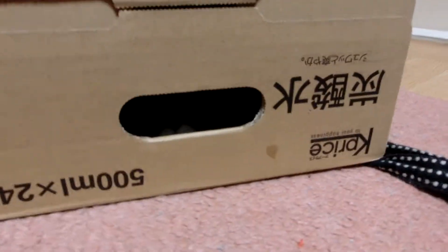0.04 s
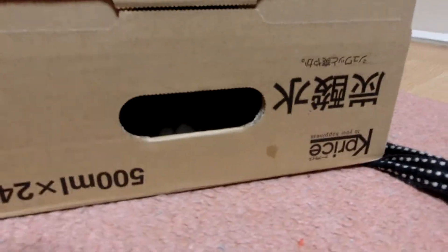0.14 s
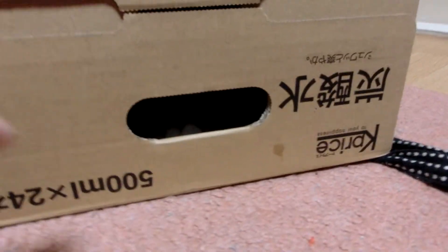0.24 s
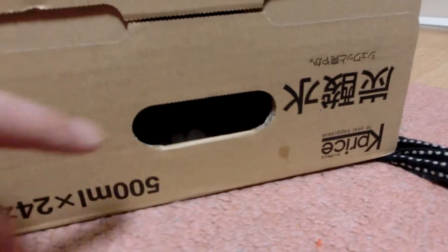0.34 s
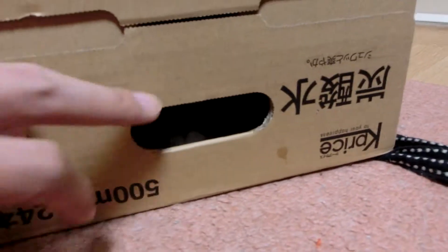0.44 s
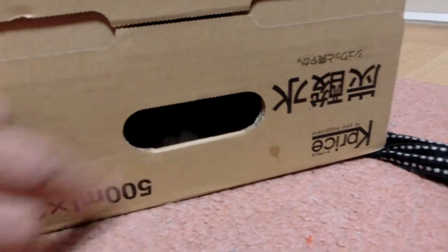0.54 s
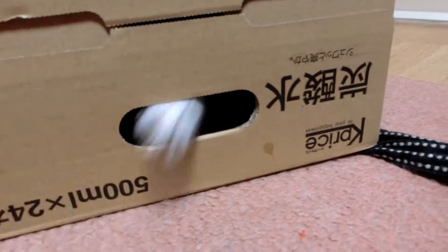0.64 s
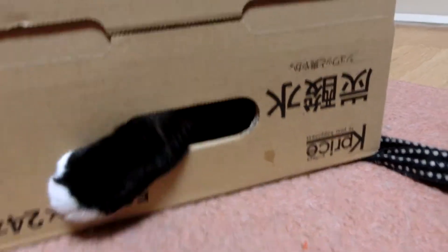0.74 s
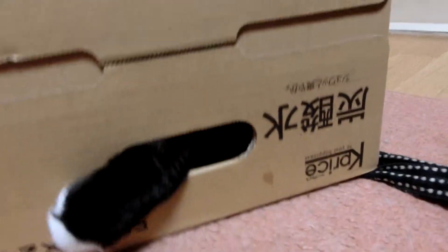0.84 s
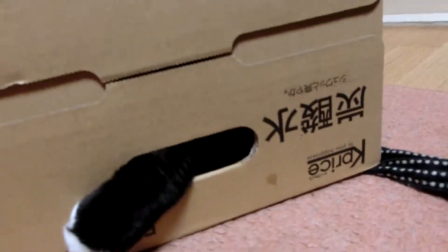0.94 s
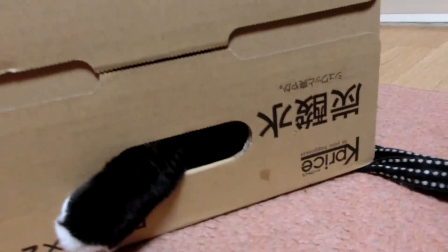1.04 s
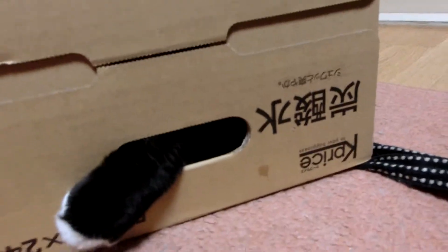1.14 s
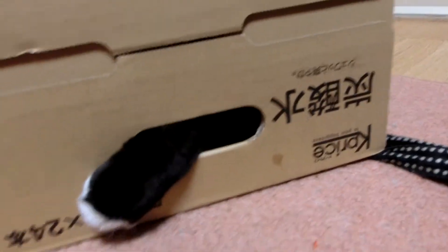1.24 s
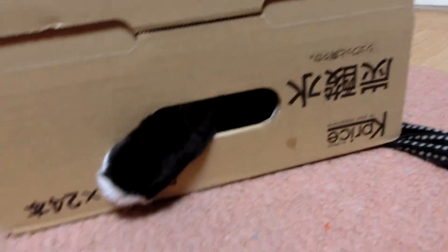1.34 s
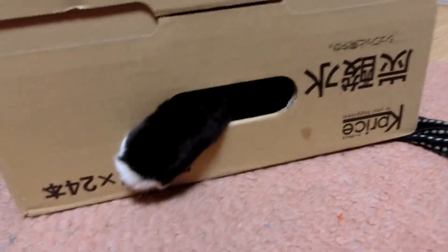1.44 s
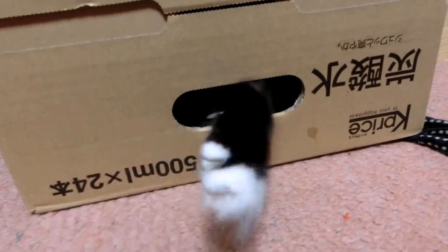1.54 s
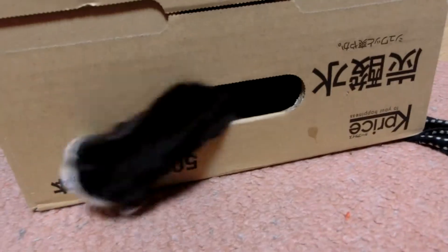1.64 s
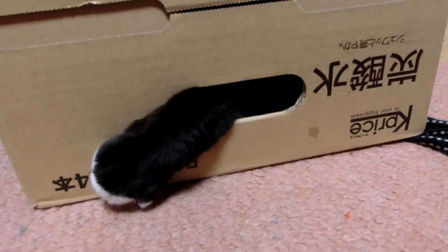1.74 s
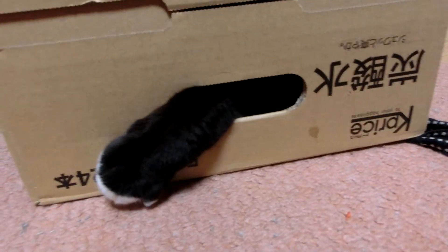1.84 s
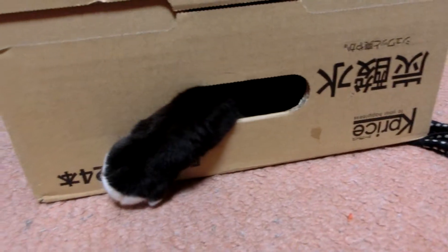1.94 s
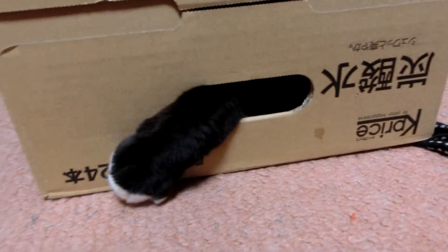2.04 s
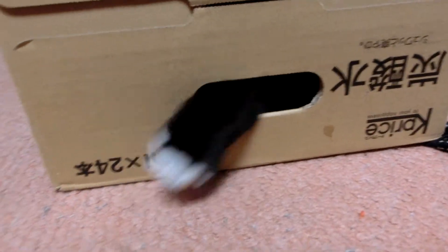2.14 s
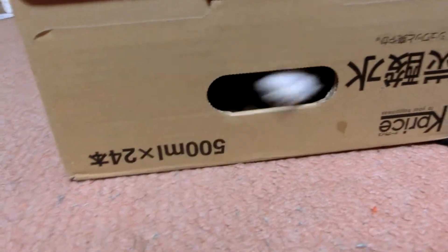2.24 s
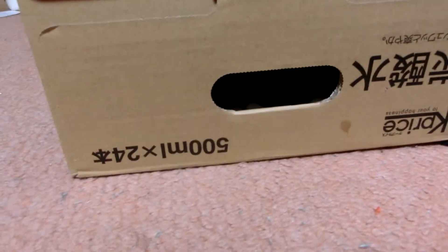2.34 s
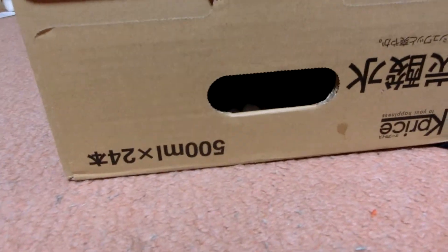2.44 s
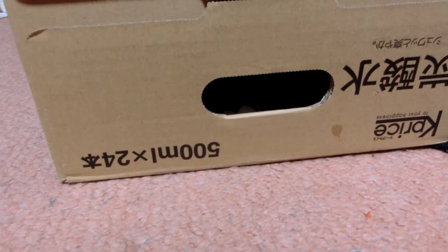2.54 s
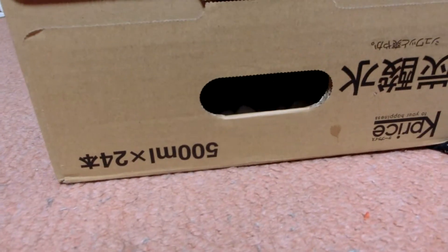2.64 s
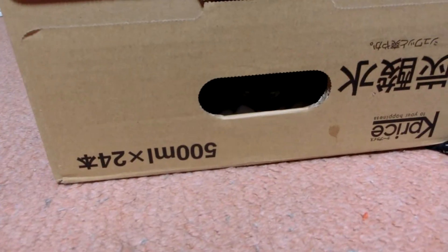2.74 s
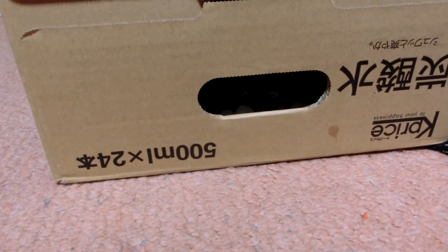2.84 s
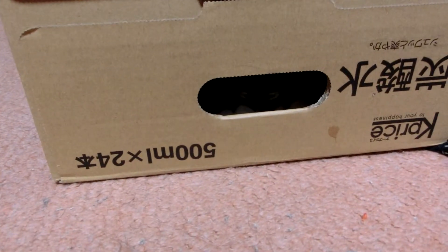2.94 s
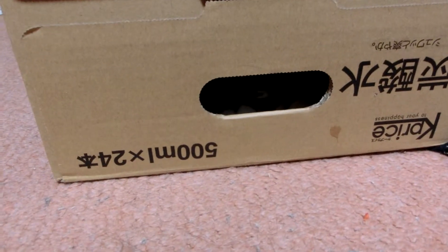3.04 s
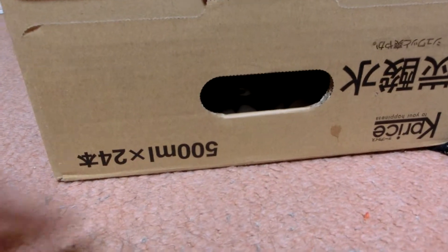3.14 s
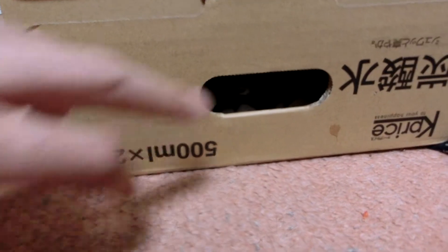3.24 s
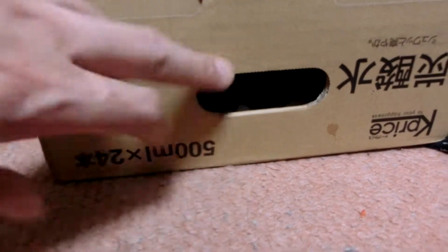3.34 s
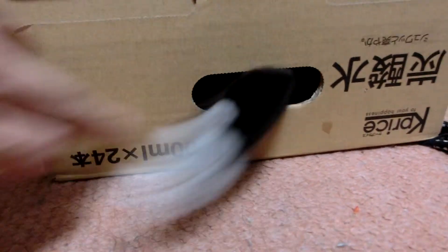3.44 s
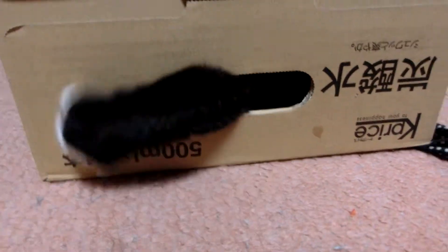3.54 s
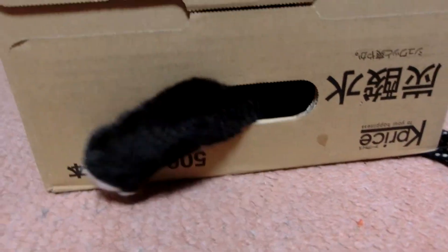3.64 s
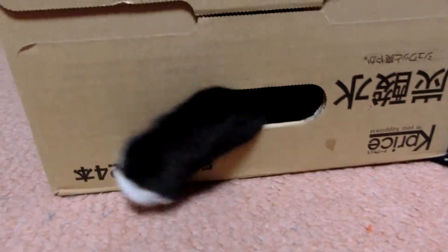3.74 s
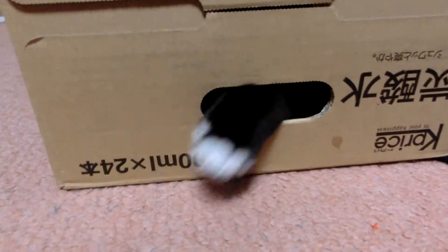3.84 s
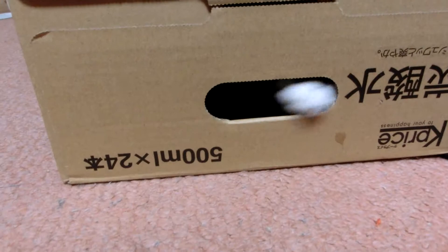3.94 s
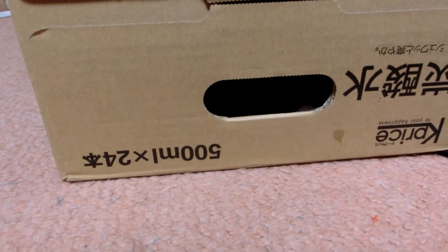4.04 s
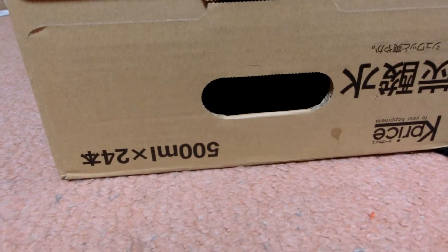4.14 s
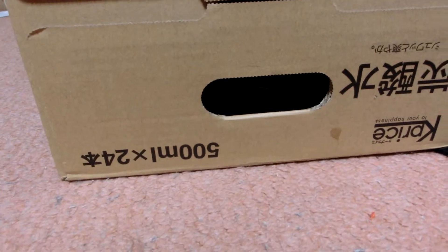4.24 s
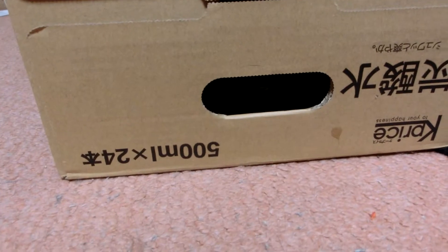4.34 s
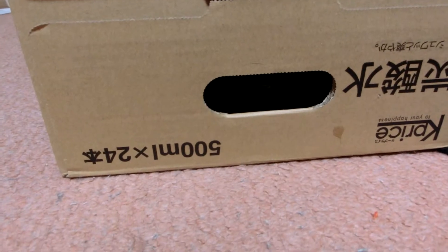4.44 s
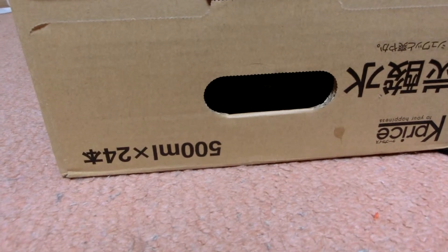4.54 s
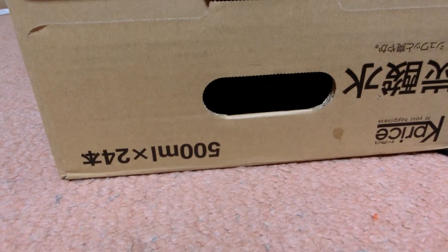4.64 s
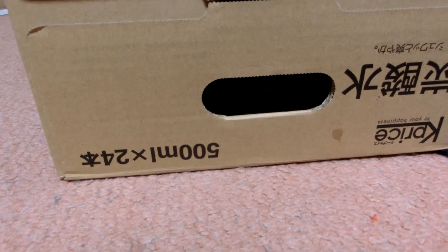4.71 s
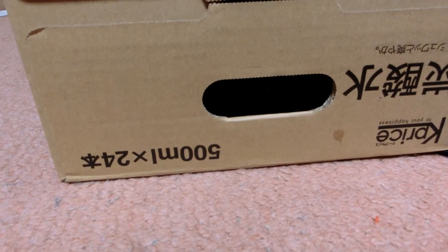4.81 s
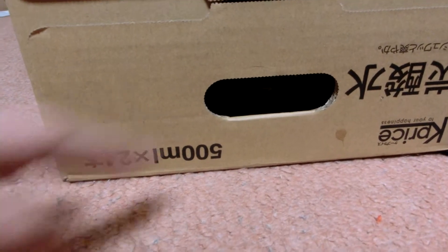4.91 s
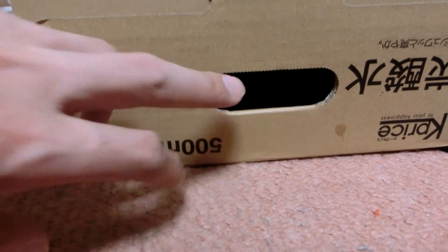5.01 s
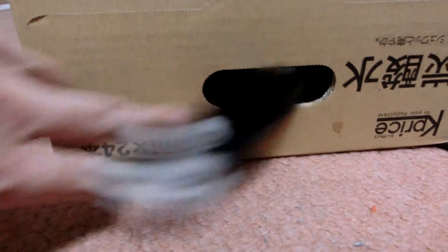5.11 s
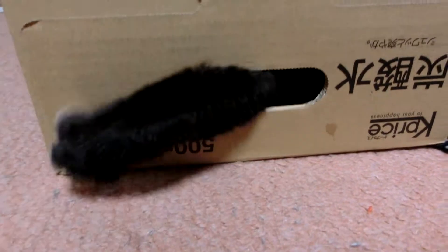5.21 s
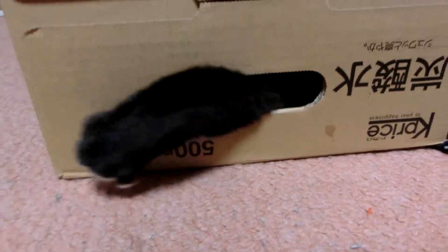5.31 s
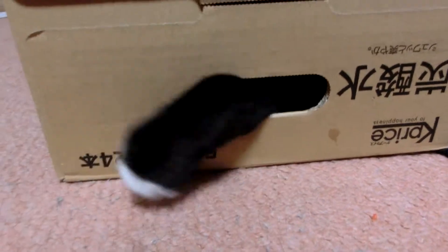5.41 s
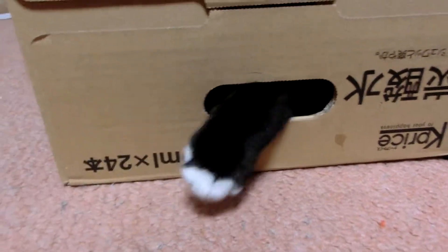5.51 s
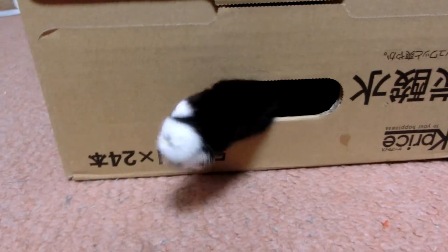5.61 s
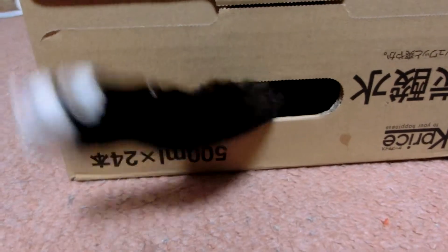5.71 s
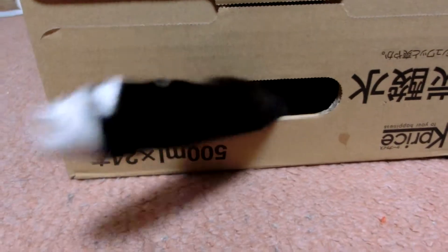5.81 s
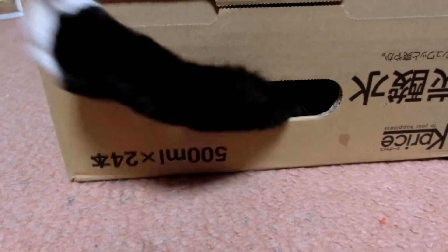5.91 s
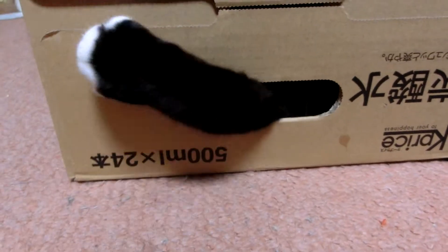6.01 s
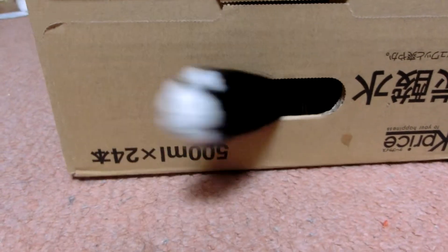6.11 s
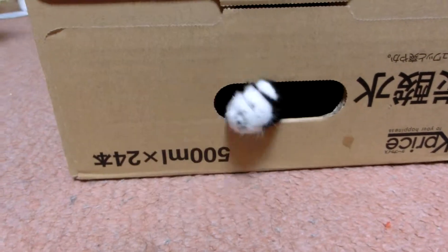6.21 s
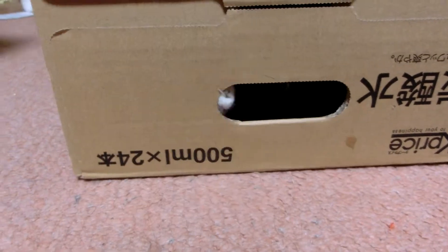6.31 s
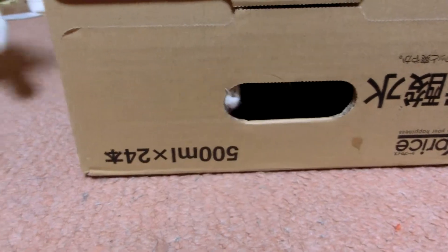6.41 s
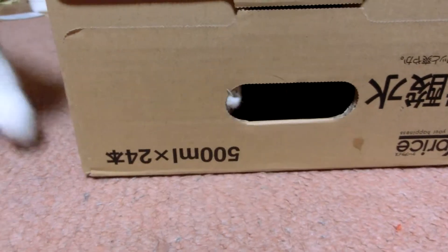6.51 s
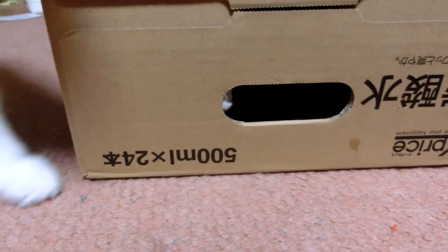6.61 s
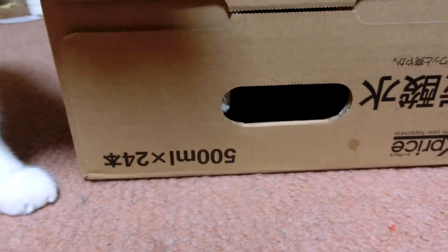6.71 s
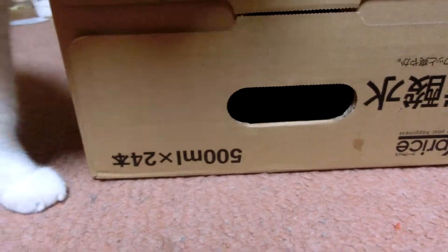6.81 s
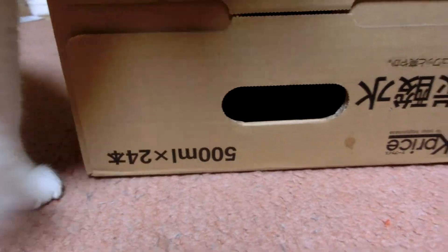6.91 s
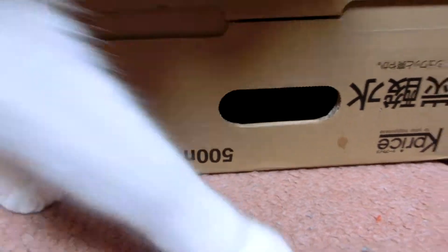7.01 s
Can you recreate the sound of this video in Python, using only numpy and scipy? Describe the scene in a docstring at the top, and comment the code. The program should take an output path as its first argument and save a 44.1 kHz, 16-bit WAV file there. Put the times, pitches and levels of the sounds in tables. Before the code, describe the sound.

A dry handling rustle opens the scene over a faint low mains hum and soft room hiss. At about 0.5 s there is a light bump, then at 0.7 s a cluster of hollow cardboard knocks with scraping. Around 1.5 s fur drags and swells into a hard, boxy thud with claw ticks at 1.66 s. Lighter brushing and a small tap follow at 2.1 to 2.4 s, then quiet. A fingertip taps and rasps the card at 3.23 s; from 3.4 to 3.7 s two strong thumps, the second with a loud crack, come with rough scrapes and small squeaks. After a faint rub near 4 s it is nearly silent until 5.1 s, when rapid deep thumps and rattling knocks begin. Scuffs, shoves and claw ticks continue to about 6.4 s, with a sharp knock at 6 s. A soft bump follows at 6.6 s, then a bright, crisp claw click at 6.8 s.

```python
"""A cat inside a cardboard box on a carpet swipes a paw out through the handle hole, close to a camera.
Soft pads thump the air in the box as damped swings; knuckles and claws excite decaying modes of its walls.
Fur drags, shoves and coarse rasps are random slips shaped by spectra and strokes; brief pitched sounds flutter.
Near 3.23 s a fingertip taps and brushes the card; a handling rustle opens the scene.
A mains appliance hums as two sines over filtered room noise; gain control sinks after the hardest blows."""
import sys
import numpy as np
from scipy import signal
from scipy.fft import rfft, irfft
from scipy.io import wavfile
from scipy.ndimage import uniform_filter1d

SR = 44100
rng = np.random.default_rng(int(sys.argv[2]) if len(sys.argv) > 2 else 0)


def put_to_file(sound):
    """Save the sound as 16-bit audio at rate SR, in the file named by the first command-line argument."""
    columns = np.atleast_2d(sound).T  # one column per channel
    safe = np.clip(columns, -1, 1)
    whole_steps = np.round(safe * 32767)
    wavfile.write(sys.argv[1], SR, whole_steps.astype(np.int16))


N = 311346

# Tones of the mains appliance: pitch_hz, level_db (rms)
HUM_TONES = [(99.9, -39), (199.8, -56.5)]
# Relative spectrum of the steady room noise: frequency_hz, density_db (per Hz)
ROOM_SPECTRUM = [(20, 6.5), (50, -4), (130, -2), (220, -1), (320, -5.5), (650, -12), (1300, -9),
                 (2000, -11.5), (3000, -15), (5000, -18), (7500, -18.5), (9600, -13.5), (14200, -14),
                 (16400, -36)]
ROOM_DB = -48  # rms of the broad part of the room noise
# Humming bands of the air: centre_hz, width_hz, level_db (rms)
ROOM_BANDS = [(70.75, 4.8, -49), (1880, 103, -64), (9540, 500, -65)]
# Left-right likeness of the room noise: frequency_hz, likeness (0 to 1)
ROOM_LIKENESS = [(60, 1), (240, 0.84), (950, 0.95), (3770, 0.94), (15000, 0.052)]
# Decay of the echo: frequency_hz, t60_s
ECHO_DECAY = [(150, 0.55), (800, 0.24), (3000, 0.039), (10000, 0.11)]
# Stereo width of near sounds: frequency_hz, side_minus_mid_db
SIDE_SPECTRUM = [(60, -25.5), (240, -35), (700, -25.5), (1500, -27.5), (3770, -13), (15000, -3.5)]
# Treble added on the right and taken from the left: frequency_hz, level_db (relative to the box)
TREBLE_TILT = [(8000, -64), (12000, -26), (16000, -4)]

# Relative spectrum of dragged hairs: frequency_hz, density_db (per Hz)
FUR_SPECTRUM = [(880, -37), (1500, -8), (1870, -10), (1980, -6), (2930, -7.5), (4550, -8), (7130, -4),
                (13500, 1), (15100, -10), (16400, -20.5)]
# Relative spectrum of the coarse rasps: frequency_hz, density_db (per Hz)
RASP_SPECTRUM = [(700, -27), (1300, -1), (2600, 5), (3900, -1), (6000, 5), (8000, -1), (13000, -10),
                 (16000, -20)]
# Grit, the broad bright part of the scraping card: frequency_hz, density_db (per Hz, relative)
GRIT_SPECTRUM = [(1400, -7), (2300, 0.5), (5000, -6.5), (8000, -10.5)]
# Fur drags over the rim of the hole, with a fingertip on the card near 3.23 s:
# start_s, rise_s, hold_s, level_db
BRUSHES = [(0, 0.07, .005, -65), (.475, 0.018, 0.08, -46), (0.68, .006, 0.09, -43),
           (1.526, 0.035, .01, -44), (1.6, 0.033, .015, -37), (1.663, .01, 0.039, -41),
           (2.132, .006, 0.03, -45.5), (2.209, 0.056, 0.0043, -45), (2.329, 0.045, .008, -41),
           (2.987, 0.019, 0.046, -52), (3.231, 0.005, 0.016, -38), (3.361, .018, 0.064, -45.5),
           (3.442, 0.022, 0.057, -33.5), (3.515, 0.016, 0.07, -38), (3.991, 0.092, 0.0056, -47.5),
           (5.102, 0.021, 0.076, -40), (5.146, 0.019, 0.091, -40), (5.19, .008, 0.0058, -33.5),
           (5.3, .11, 0.068, -49.5), (5.698, 0.021, 0.025, -33), (5.865, 0.013, 0.019, -31),
           (5.92, .01, .07, -49.5), (5.984, 0.0093, 0.023, -41.5), (6.045, 0.067, 0.15, -48.5),
           (6.252, 0.02, 0.003, -34), (6.278, .01, 0.054, -44.5), (6.596, .018, .005, -45.5),
           (6.805, 0.0027, .003, -37), (6.815, .005, 0.028, -42.5)]
# Coarse rasps, a handling rustle at the start, later likely a fingertip on the card:
# start_s, rise_s, hold_s, level_db
RASPS = [(0, 0.0028, .09, -46.5), (3.234, .006, 0.029, -38), (3.272, 0.021, 0.031, -45.5)]
# Shoves of the box by the leg, with a fingertip on the card near 3.23 s:
# start_s, rise_s, hold_s, scrape_db (on the card), wobble_db (of the walls)
SHOVES = [(0, 0.00089, 0.11, -38.5, -72), (0.667, 0.044, .01, -50, -41), (0.749, 0.0066, 0.071, -33.5, -38),
          (.84, 0.019, 0.18, -72, -46.5), (1.538, 0.13, .01, -45.5, -38), (1.673, .01, 0.056, -39, -31.5),
          (1.76, 0.028, 0.068, -61, -38), (2.326, 0.045, 0.024, -38.5, -40),
          (3.23, .006, 0.075, -49.5, -75), (3.38, 0.067, 0.0046, -42.5, -34.5),
          (3.484, 0.043, .005, -39.5, -26), (3.53, .01, 0.058, -31.5, -22.5),
          (3.592, 0.018, 0.093, -49, -29), (3.69, 0.019, 0.048, -41, -37.5),
          (3.758, 0.023, 0.087, -49, -43.5), (4.028, 0.034, 0.036, -46.5, -42),
          (5.103, 0.02, 0.12, -45, -28), (5.236, 0.011, 0.056, -46.5, -31),
          (5.677, 0.052, 0.0069, -39, -31), (5.757, 0.044, 0.084, -52.5, -38.5),
          (5.831, 0.064, .005, -36.5, -35), (6.003, 0.02, 0.19, -49, -36), (6.17, 0.028, 0.3, -44.5, -38.5),
          (6.58, 0.044, 0.11, -60, -43.5)]
RISE_DB = 17  # how far a stroke swells
BRUSH_SAG_DB_PER_S, BRUSH_FALL_DB_PER_S = 57, 700  # while held, then dying away
SHOVE_SAG_DB_PER_S, SHOVE_FALL_DB_PER_S = 64, 801
# After each blow the box skids and shakes: level relative to its knock or thump, then decay
SKID_DB, SKID_DB_PER_S, SHAKE_DB, SHAKE_DB_PER_S = -33.5, 260, -23, 329

# Brief pitched sounds, sliding squeaks and one claw tick ringing near 8 kHz:
# start_s, level_db, pitch_hz, length_s
SQUEAKS = [(.5682, -40, 2640, .006), (0.5684, -34.5, 7600, 0.0048), (3.579, -37, 1740, .014),
           (3.633, -45, 2770, 0.013), (3.632, -45, 2100, .012), (3.690, -46, 3080, .008),
           (5.198, -28, 7960, 0.013), (6.8084, 1, 8080, 0.00082)]
SQUEAK_FUZZ = 0.56  # how unevenly a squeak flutters
# Ticks of claw tips, with a fingertip on the card near 3.23 s: start_s, level_db, pitch_hz
TICKS = [(0.7465, -22, 2330), (1.664, -11, 2500), (1.6734, -11.5, 3600), (2.3872, -30, 4000),
         (3.235, -27, 5820), (3.5376, -3.5, 2160), (5.217, -36, 9000), (5.230, -28, 4030),
         (5.877, -29, 7200), (5.991, -16.5, 6760), (6.207, -25, 9800), (6.265, -26, 10300),
         (6.27, -29, 8640), (6.278, -19.5, 4130), (6.307, -20.5, 3950), (6.8086, -5.5, 12700),
         (6.8208, -36, 8500)]
TICK_CYCLES, TICK_T60_S = 22, .005  # a tick lasts a fixed time plus some cycles of its pitch
CRACK_REACH = 3.05  # the crack of a tick dulls above this multiple of its pitch
# Modes of the box walls before bending: pitch_hz, level_db (relative), t60_s
WALL_MODES = [(177.3, 2, 0.17), (383.2, 2.5, 0.045), (608, 6.5, 0.011), (834, 4.5, 0.013),
              (1053, 1.5, 0.018), (1223, 4.5, 0.0093), (1689, 2, 0.0085), (1923, -1, 0.013),
              (2205, 2, 0.011), (2500, 0.5, 0.011), (3350, 1.5, 0.015), (4040, -3.5, 0.0076)]
# Knocks on the walls: start_s, level_db (peak), pitch_hz (favoured by the struck spot), spread_octaves
KNOCKS = [(.478, -31.5, 604, 0.77), (0.708, -32, 1240, 0.55), (.734, -12, 503, 1), (0.7431, -6, 635, 0.17),
          (0.7462, -4.5, 1026, 0.66), (0.7654, -15.5, 890, 0.37), (0.7771, -15.5, 1230, 0.22),
          (0.809, -23, 1440, 0.58), (1.6629, 7.5, 892, 0.26), (1.6671, -6, 1300, 1),
          (1.6734, -4, 1250, 1.1), (1.779, -24.5, 336, 1.2), (2.139, -30, 1020, 1),
          (2.3869, -21, 594, 0.73), (2.667, -32, 530, 0.45), (3.459, -10, 776, 0.95),
          (3.5376, 3.5, 972, 0.63), (3.540, -4.5, 800, 0.14), (3.601, -20, 380, 0.6),
          (3.663, -23.5, 600, 0.79), (3.692, -27, 1170, 1.24), (4.069, -35, 1300, 0.31),
          (4.092, -28.5, 1033, 0.63), (5.126, -12, 846, 0.91), (5.145, -23, 790, 0.86),
          (5.160, -20.5, 327, .8), (5.172, -28, 900, .8), (5.186, -25, 503, 0.5), (5.198, -20, 700, 0.39),
          (5.217, -19, 560, 0.54), (5.2306, -11.5, 1390, 0.99), (5.256, -17, 504, 1.46),
          (5.313, -15.5, 339, 1.2), (5.355, -24.5, 350, 1.3), (5.43, -26.5, 322, 1.5),
          (5.7202, -30.5, 685, 1.1), (5.769, -24, 333, 1.7), (5.932, -19, 294, 1.7),
          (5.968, -22, 331, 1.25), (5.991, -7, 550, 0.31), (5.996, -11, 1510, 0.66), (6.022, -18, 370, 1.5),
          (6.076, -18, 370, 1.33), (6.127, -22, 403, 1.6), (6.139, -26.5, 1180, 1.8),
          (6.199, -20, 1137, 0.74), (6.204, -19, 1025, 1.9), (6.264, -25, 1135, 1.4),
          (6.276, -23, 1340, 1.9), (6.307, -16.5, 1441, 2.1), (6.333, -30.5, 600, 1),
          (6.357, -30.5, 696, 0.4), (6.379, -32, 1000, 0.3), (6.392, -31, 1020, 0.5),
          (6.613, -26, 750, 0.92), (6.639, -30.5, 482.5, 0.3), (6.8075, -12, 900, 3)]
# Pushes of the padded paw: start_s, level_db (peak), pitch_hz (air in the box), t60_s, rise_cycles
THUMPS = [(.478, -25.5, 91, 0.057, 0.33), (.495, -17, 84, 0.051, 0.46), (0.683, -25, 100, 0.066, 0.25),
          (.706, -21.5, 109, .05, 0.14), (0.735, -18, 153, 0.034, 1), (1.547, -20, 68, .072, 0.46),
          (1.6533, -0.5, 102.4, 0.022, 0.83), (2.385, -27.5, 100.3, 0.082, 0.55),
          (3.374, -15.5, 87, 0.051, 0.4), (3.460, -2.5, 102, 0.044, 0.24), (3.5249, 1.5, 99.8, 0.028, 0.88),
          (4.1, -30, 91, 0.058, 0.95), (5.127, -8, 129, 0.046, 0.56), (5.144, -2, 111, 0.04, 0.29),
          (5.185, -5, 77, 0.079, 0.43), (5.214, -18, 82, 0.078, .6), (5.715, -9, 84.5, 0.063, 0.92),
          (6.202, -28, 101, .075, 0.53), (6.274, -25, 109, 0.074, 0.34), (6.305, -24.5, 103, 0.1, 0.29),
          (6.539, -24.5, 103, 0.029, 0.39), (6.809, -13, 97.4, 0.032, 0.083)]

EDGE_HZ = 16400  # upper band limit


def gain_of(db):
    """Logarithmic level: decibels become an amplitude factor."""
    return 10 ** (np.asarray(db) / 20)


def evened(x):
    """Normalisation: scales a signal to rms 1."""
    return x / np.sqrt(np.mean(x ** 2) + 1e-20)


def read(points, hz):
    """Interpolation: reads a table along a log-frequency axis."""
    f, value = np.transpose(points)
    return np.interp(np.log(hz + 1), np.log(f + 1), value)


def coloured(x, spectrum):
    """Linear filtering: weights each frequency by a spectrum in dB."""
    return irfft(rfft(x) * gain_of(read(spectrum, np.fft.rfftfreq(N, 1 / SR))), N)


def add(mix, s, sound):
    """Superposition: mixes a sound in at s seconds."""
    part = mix[round(s * SR):][:len(sound)]
    part += sound[:len(part)]


def room():
    """Partial coherence: steady noise, more alike in both channels in the bass, joins two mains tones."""
    frames, hz = N // 512 + 5, np.fft.rfftfreq(4096, 1 / SR)
    a, b, c, d = rng.standard_normal((frames // 2 + 4, len(hz), 4)).T
    shape = gain_of(read(ROOM_SPECTRUM, hz))
    shape *= gain_of(ROOM_DB) / np.linalg.norm(shape)
    for centre_hz, width_hz, db in ROOM_BANDS:
        band = np.exp(-((hz - centre_hz) / width_hz) ** 2)
        shape = np.hypot(shape, gain_of(db) * band / np.linalg.norm(band))
    same = np.clip(read(ROOM_LIKENESS, hz), -1, 1)[:, None]
    left = a + 1j * b
    right = same * left + np.sqrt(1 - same ** 2) * (c + 1j * d)
    frames_of_noise = np.array([left, right]) * shape[:, None]
    noise = signal.istft(frames_of_noise, nperseg=4096, noverlap=3072)[1][:, :N]
    noise = np.linalg.norm(shape) * evened(noise)
    t = np.arange(N) / SR
    hum = sum(np.sqrt(2) * gain_of(db) * np.sin(2 * np.pi * f * t) for f, db in HUM_TONES)
    return noise + hum


def echo(x):
    """Reverberation: sparse taps of random sign whose bands die at their own speeds, nearly alike per channel."""
    taps = np.zeros((2, SR // 2))
    at = np.arange(200, SR // 2 - 20, 20) + rng.integers(0, 20, (2, (SR // 2 - 201) // 20))
    np.put_along_axis(taps, at, rng.choice([-1., 1.], at.shape), 1)
    taps[1] = 0.99 * taps[0] + 0.044 * taps[1]
    hz, t, z = signal.stft(taps, SR, nperseg=256)
    decay = gain_of(-60 * t / read(ECHO_DECAY, hz)[:, None])
    tail = signal.istft(z * decay, SR, nperseg=256)[1]
    return signal.fftconvolve(x[None], tail / np.linalg.norm(tail[0]), axes=1)[:, :N]


def ring(hz, t60, rise):
    """Damped oscillation: a swing of peak 1 that starts inward and grows over about rise seconds."""
    t = np.arange(SR // 5) / SR
    swing = -np.sin(2 * np.pi * hz * t) * (1 - np.exp(-(t / rise) ** 3)) * gain_of(-60 * t / t60)
    return swing / abs(swing).max()


def walls(hz, octaves, spot_db=0):
    """Modal superposition: a blow excites modes near hz, and the pressing paw bends panel modes toward it."""
    modes = np.transpose(WALL_MODES)[0]
    nearest = modes[np.argmin(abs(np.log(modes / hz)))]
    bend = np.clip(hz / nearest, .85, 1.15)
    modes = np.where(modes > 450, bend, 1) * modes  # the low modes stay put
    near_db = -6 * (np.log2(modes / hz) / octaves) ** 2 + spot_db
    answer = sum(gain_of(db + near) * ring(f, t60, 0.51 / f)
                 for (_, db, t60), f, near in zip(WALL_MODES, modes, near_db))
    return answer / abs(answer).max()


def grains(per_s, spread_db):
    """Stick-slip friction: random slips of either sign, a few of them large."""
    size = gain_of(spread_db * np.minimum(rng.exponential(1, N), 4)) * rng.choice([-1., 1.], N)
    return size * (rng.random(N) < per_s / SR)


def strokes(start, rise, hold, db, sag, fall):
    """Power addition: joint level of strokes that each swell, sag while held and die away."""
    power, t = np.zeros(N), np.arange(SR // 2) / SR
    for s, up, held, top in np.broadcast(start, rise, hold, db):
        up = max(up, 1 / SR)
        lost_db = RISE_DB * np.maximum(1 - t / up, 0)
        lost_db += sag * np.clip(t - up, 0, held)
        lost_db += fall * np.maximum(t - up - held, 0)
        add(power, s, gain_of(2 * (top - lost_db)))
    return np.sqrt(abs(uniform_filter1d(power, size=150)))


def rasps():
    """Coarse friction: coloured random slips, shaped by strokes, make a rustle and later rasps."""
    rasp = evened(coloured(grains(3000, 1.9), RASP_SPECTRUM))
    return rasp * strokes(*np.transpose(RASPS), BRUSH_SAG_DB_PER_S, BRUSH_FALL_DB_PER_S)


def brushes():
    """Fine friction: dense slips, mostly of fur over the rim, make a coloured hiss."""
    fur = evened(coloured(grains(9240, 4.2), FUR_SPECTRUM))
    return fur * strokes(*np.transpose(BRUSHES), BRUSH_SAG_DB_PER_S, BRUSH_FALL_DB_PER_S)


def scrapes():
    """Friction driving resonance: fine slips excite the upper wall modes, with broad grit, and trail knocks."""
    scrape = evened(signal.oaconvolve(grains(2500, 4.3), walls(1220, 0.85))[:N])
    grit = evened(coloured(grains(4000, 3.4), GRIT_SPECTRUM))
    scrape = evened(scrape + 0.31 * grit)
    *shove, scrape_db, _ = np.transpose(SHOVES)
    knock_s, knock_db = np.transpose(KNOCKS)[:2]
    skid = strokes(knock_s, 0.0092, 0, knock_db + SKID_DB, 0, SKID_DB_PER_S)
    return scrape * np.hypot(skid, strokes(*shove, scrape_db, SHOVE_SAG_DB_PER_S, SHOVE_FALL_DB_PER_S))


def wobbles():
    """Low-mode excitation: coarse slips shake the lowest wall modes during shoves and after thumps."""
    wobble = evened(signal.oaconvolve(grains(250, 3.3), walls(275, 0.94))[:N])
    *shove, _, wobble_db = np.transpose(SHOVES)
    thump_s, thump_db = np.transpose(THUMPS)[:2]
    shake = strokes(thump_s, 0.011, 0, thump_db + SHAKE_DB, 0, SHAKE_DB_PER_S)
    return wobble * np.hypot(shake, strokes(*shove, wobble_db, SHOVE_SAG_DB_PER_S, SHOVE_FALL_DB_PER_S))


def squeaks():
    """Amplitude modulation: brief swelling tones flutter as sliding squeaks; one rings as a claw tick."""
    out = np.zeros(N)
    flutter = evened(uniform_filter1d(rng.standard_normal((len(SQUEAKS), 1000)), size=40))
    for (s, db, hz, length), grip in zip(SQUEAKS, flutter):
        t = np.arange(0, length, 1 / SR)
        swell = np.sin(np.pi * (t / length) ** 0.82) ** 2 * (1 + SQUEAK_FUZZ * grip[:len(t)])
        add(out, s, gain_of(db) * swell * np.sin(2 * np.pi * hz * t))
    return out


def ticks():
    """Impulsive contact: each tick gives a brief damped tone and a noisy crack."""
    out = np.zeros(N)
    snaps = rng.standard_normal((len(TICKS), 900))
    onset = signal.windows.tukey(1800, .02)[:900]
    for (s, db, hz), snap in zip(TICKS, snaps):
        t60 = TICK_T60_S + TICK_CYCLES / hz
        crack = (snap - 0.33 * np.roll(snap, 1)) * onset * gain_of(-60 * np.arange(900) / SR / t60)
        dull = np.exp(-2 * np.pi * CRACK_REACH * hz / SR)
        crack = signal.lfilter([1 - dull], [1, -dull], crack)
        tone = ring(hz, .5 * t60, .0001)[:900]
        add(out, s, gain_of(db) * (0.85 * tone + 1.28 * crack))
    return out


def knocks():
    """Impact excitation: each struck spot couples differently to each wall mode, and further toes follow."""
    out = np.zeros(N)
    spots = rng.standard_normal((len(KNOCKS), len(WALL_MODES)))
    toes = rng.random((len(KNOCKS), 3))
    for (s, db, hz, octaves), spot, late in zip(KNOCKS, spots, toes):
        # the other toes land a moment later, more lightly
        for k, lag in enumerate(np.cumsum(0.00197 + .005 * late)):
            toe_db = db - 12.5 - 9.4 * k
            add(out, s + lag, gain_of(toe_db) * walls(hz, octaves, 3 * np.roll(spot, k + 1)))
        add(out, s, gain_of(db) * walls(hz, octaves, 2 * spot))
    return out


def thumps():
    """Air resonance: a soft push sets the air in the box into a damped swing."""
    out = np.zeros(N)
    for s, db, hz, t60, cycles in THUMPS:
        add(out, s, gain_of(db) * ring(hz, t60, cycles / hz))
    return out


def scene():
    """Near-field stereo: random scatter widens the box, mostly in the treble, over its echo and the room."""
    box = thumps() + knocks() + ticks() + squeaks() + brushes() + rasps() + scrapes() + wobbles()
    scatter = rng.standard_normal((2, 400)) * np.exp(-np.arange(400) / 70)
    scatter /= np.linalg.norm(scatter[0])
    # slow steady turning between two random scatters, at 2.2 Hz, keeps the stereo spread changing
    turn = 2 * np.pi * 2.2 * np.arange(N) / SR
    scattered = signal.oaconvolve(box * [np.cos(turn), np.sin(turn)], scatter, axes=1)
    side = coloured(scattered.sum(0)[:N], SIDE_SPECTRUM) * [[1], [-1]]
    tilt = coloured(box, TREBLE_TILT) * [[-1], [1]]
    return box + side + tilt + gain_of(-20.5) * echo(box) + room()


def record(dry):
    """Level compression: peaks pull the gain down and it creeps back; hard limiting and a low-pass follow."""
    dry = signal.lfilter(*signal.butter(1, 45, "highpass", fs=SR), dry)  # small capsules lose the lowest bass
    peak_db = 20 * np.log10(abs(dry).max(0) + 1e-6)
    over_db = 0.67 * np.maximum(peak_db + 1.0, 0)  # threshold -1 dB
    climb = np.arange(N) * 3.05 / SR  # recovers this many dB a second
    held_db = np.maximum.accumulate(over_db + climb) - climb
    lag = np.exp(-1 / (0.0018 * SR))  # the gain follows with a 1.8 ms time constant
    ducked = dry / gain_of(signal.lfilter([1 - lag], [1, -lag], held_db))
    limited = np.clip(ducked, -1, 1)
    return signal.oaconvolve(limited, signal.firwin(511, EDGE_HZ, window=("kaiser", 9), fs=SR)[None], "same")


dry = scene()
out = record(dry)
put_to_file(out)
```